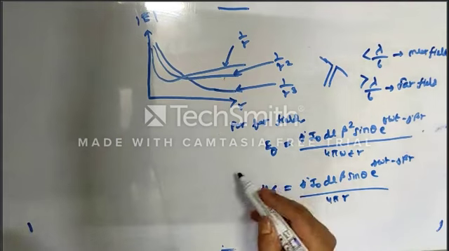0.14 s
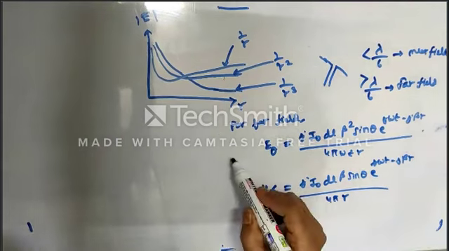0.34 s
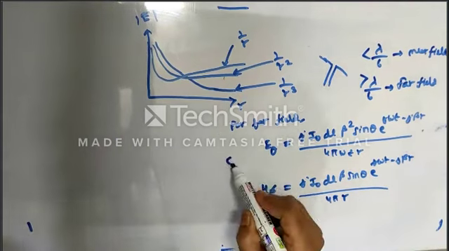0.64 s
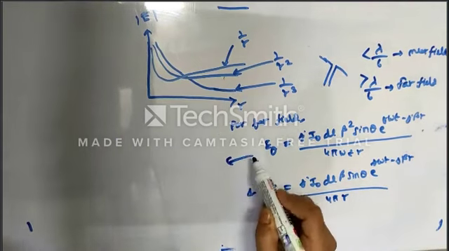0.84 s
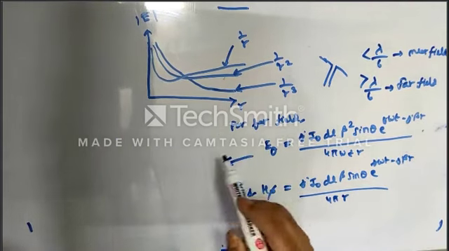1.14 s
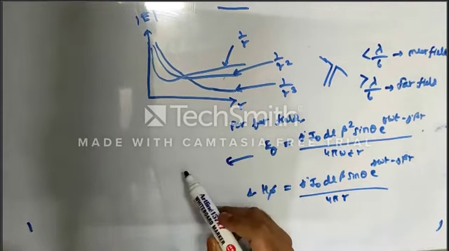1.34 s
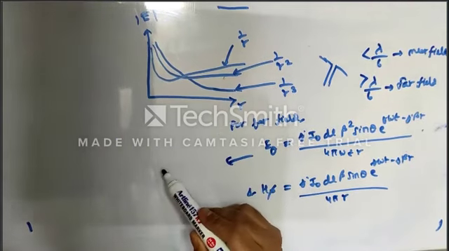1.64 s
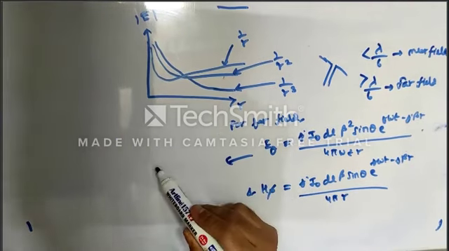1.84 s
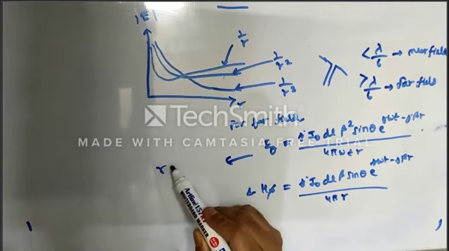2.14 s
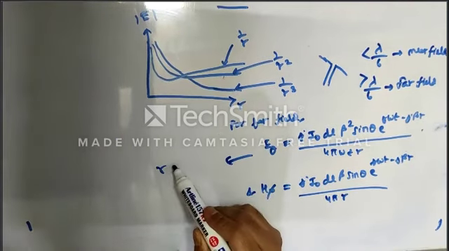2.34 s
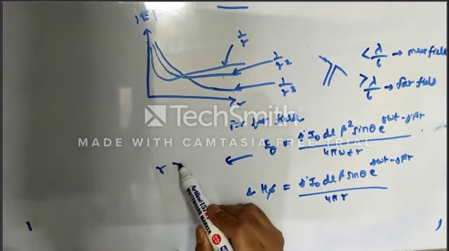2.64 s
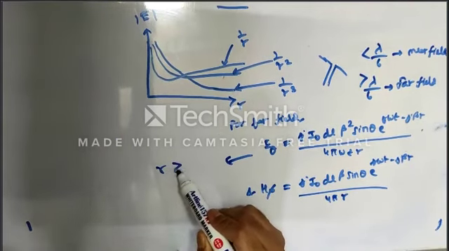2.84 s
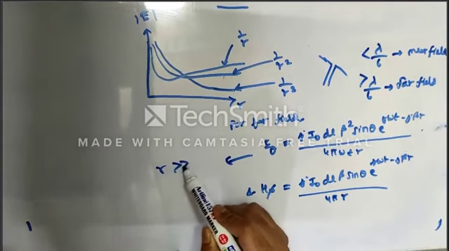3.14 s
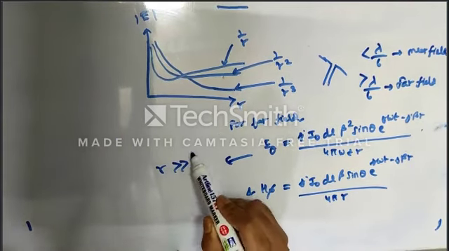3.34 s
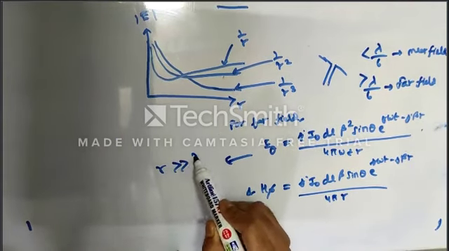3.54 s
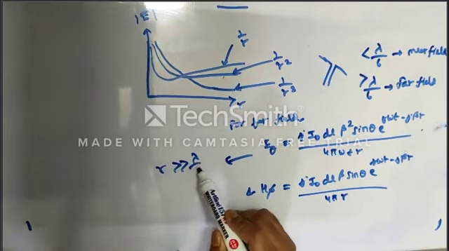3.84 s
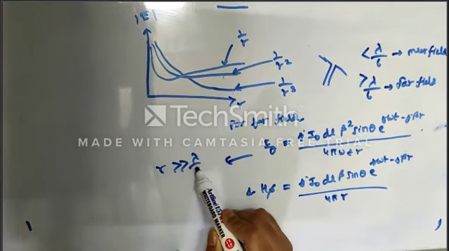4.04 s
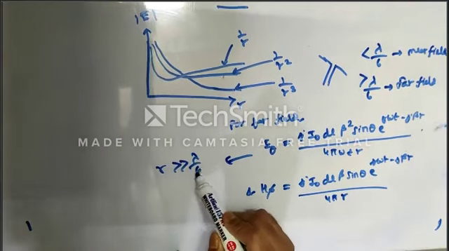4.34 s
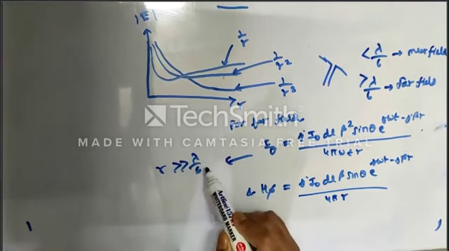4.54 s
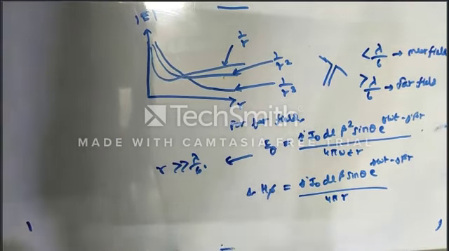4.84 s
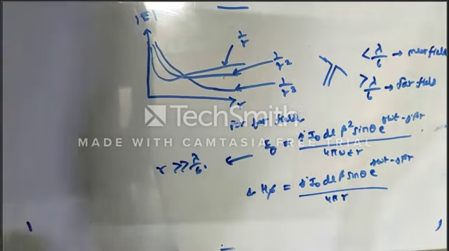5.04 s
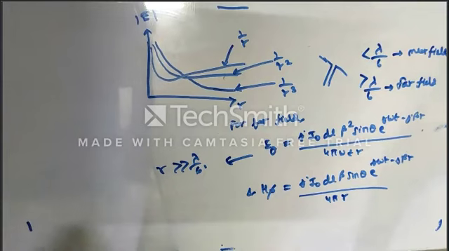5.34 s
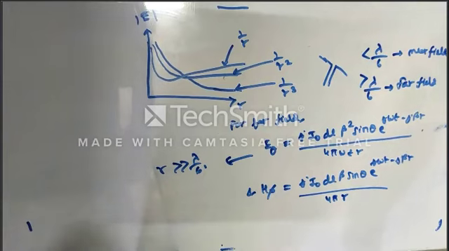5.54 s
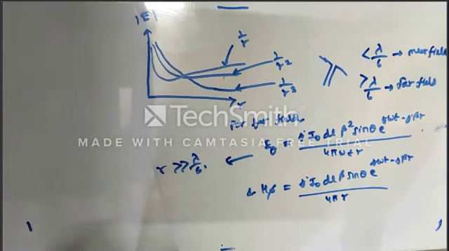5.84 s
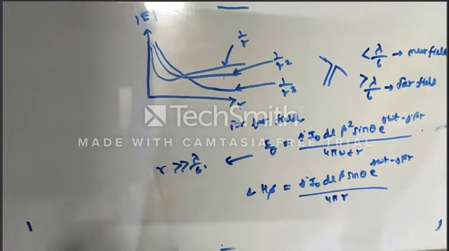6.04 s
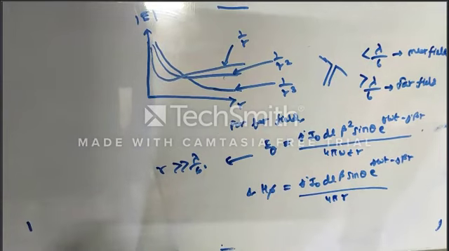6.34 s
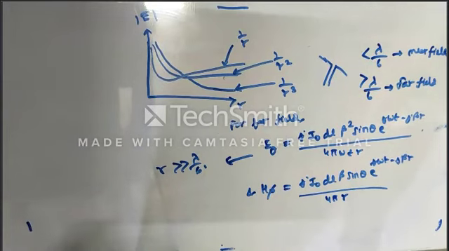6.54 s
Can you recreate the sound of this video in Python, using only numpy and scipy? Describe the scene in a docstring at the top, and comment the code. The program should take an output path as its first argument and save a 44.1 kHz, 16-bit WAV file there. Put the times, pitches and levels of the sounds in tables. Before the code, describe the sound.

Over the low hum of a quiet room and the soft ticking of a wall clock, a marker nib knocks unevenly on a whiteboard, scratching and squealing briefly as it writes. A hand slides on the panel with a faint rumble. The writing stops with a sleeve rustle and a cluster of taps, one a sharp crack, then the clock and room carry on. A stereo microphone gives a wide image with a slight echo on the taps.

```python
"""A felt marker writes on a wall whiteboard in a quiet room, heard through a widened stereo microphone.
From the start the room hums and hisses, a resting hand makes the panel rumble, and the dragged felt hisses.
Near 0.7 s a wall clock starts ticking each second; just after it the nib first thumps the panel and squeals.
Taps and strokes go on until a sleeve rustles near 4.8 s and the sharpest knock lands near 5 s.
After that only the sliding hand, the clock and the room are left."""
import sys
import numpy as np
from scipy import signal
from scipy.fft import rfft, irfft, next_fast_len
from scipy.io import wavfile
from scipy.ndimage import uniform_filter1d

SR = 44100
rng = np.random.default_rng(int(sys.argv[2]) if len(sys.argv) > 2 else 0)


def dump_mix(stems):
    """Bounce the given channels to the path in sys.argv[1] as a 16-bit WAV at rate SR."""
    frames = np.atleast_2d(stems).T  # one column per channel
    limited = np.clip(frames, -1, 1)  # hard clip at full scale
    pcm = np.round(limited * 32767).astype(np.int16)
    wavfile.write(sys.argv[1], SR, pcm)


N = 295018
T = np.arange(N) / SR

# the panel's modes, the notes it rings at:
# (pitch [Hz], left level [dB], right level [dB], time to fade 60 dB [s], left delay [ms])
PANEL_MODES = [(105.9, -22.5, -17, 0.25, 0.00023), (142.7, -3, -6, 0.087, 0.54),
               (179.7, -1, -1.5, 0.088, 0.84), (208.3, -7.5, -45, 0.13, 0.5),
               (251.3, -21.5, -20, 0.15, 0.53), (306.4, -5.5, -11.5, 0.14, -0.8),
               (401, -9, -14.5, 0.1, 0.76), (510.7, -17, -18, 0.08, -0.23), (643, -25, -41, 0.059, 0.88),
               (845, -30, -33, .04, -0.4), (985, -29, -24, .037, 0.066)]
# how alike the two sides sound: (frequency [Hz], likeness [1 = same, 0 = unrelated, -1 = opposite])
AIR_LIKENESS = [(60, 0.99), (99, 1.0), (160, 1), (270, 0.81), (450, 0.47), (740, -0.13), (1220, -0.13),
                (2010, -0.44), (3330, -0.1), (5500, 0.2), (9080, 0.99), (15000, 0.91)]
FELT_LIKENESS = [(1000, 0.22), (2400, -0.071), (5000, -0.15), (8000, 0.87), (11000, 0.8), (15000, 0.6)]
CLOCK_LIKENESS = [(60, 0.9), (130, 0.99), (290, 0.18), (640, 0.27), (1410, -0.44), (3100, -0.37),
                  (6820, 0.65), (15000, 0.95)]
# how far a sound leans to the left: (frequency [Hz], left minus right [dB])
AIR_BALANCE = [(150, .1), (300, 4.5), (650, 7.5), (1100, 2.5), (1800, 3.5), (2500, .5), (6000, -1.5),
               (15000, -.3)]
FELT_BALANCE = [(1000, 6), (2400, 3), (5000, -6), (8000, -5.5), (12000, -3), (15000, 2)]


def gain_of(db):
    """Turns decibels into a number to multiply by."""
    return 10 ** (np.asarray(db) / 20)


def unit_level(x):
    """Scales a signal so that its average (rms) level is 1."""
    return x / np.sqrt(np.mean(x ** 2) + 1e-20)


def curve_at(points, hz):
    """Reads a table of (frequency, value) between its rows."""
    frequencies, values = np.transpose(points)
    return np.interp(np.log(hz + 1), np.log(frequencies + 1), values)


def resonate(x, hz, width):
    """Lets a signal ring at one pitch; a narrower width [Hz] rings longer."""
    decay = np.exp(-np.pi * width / SR)
    return 2 * signal.lfilter([1 - decay], [1, -decay * np.exp(2j * np.pi * hz / SR)], x).real


def narrow_band(x, hz, width):
    """Keeps the sound near one pitch by ringing it twice, and scales it to level 1."""
    return unit_level(resonate(resonate(x, hz, width), hz, width))


def widen(pair, likeness, balance=((1, 0), (2, 0)), colour_db=lambda hz: 0 * hz):
    """Mixes two unrelated signals into stereo, setting likeness, balance and tone by frequency."""
    size = next_fast_len(N)
    hz = np.fft.rfftfreq(size, 1 / SR)
    first, second = rfft(pair, size)
    alike = np.clip(curve_at(likeness, hz), -1, 1)
    lean = gain_of(curve_at(balance, hz) / 2)
    right = alike * first + np.sqrt(1 - alike ** 2) * second
    return irfft(np.array([first * lean, right / lean]) * gain_of(colour_db(hz)), size)[:, :N]


def wander(smooth_samples, length=N):
    """A random curve that drifts above and below zero."""
    return unit_level(uniform_filter1d(rng.standard_normal(length), smooth_samples))


def grit(spread_db, smooth_samples=30, length=N):
    """Noise with a fast-changing level, like many tiny slips of uneven size."""
    return rng.standard_normal((2, length)) * gain_of(spread_db * wander(smooth_samples, length))


def patchy(x, spread_db, frames, bins, size=256):
    """Raises and lowers random patches of time and frequency, less so in the bass."""
    window = dict(nperseg=size, noverlap=size * 3 // 4)
    hz, _, spectrum = signal.stft(x, SR, **window)
    patches = uniform_filter1d(rng.standard_normal(spectrum.shape[-2:]), bins, 0)
    patches = unit_level(uniform_filter1d(patches, frames, 1)) * np.minimum(hz / 600, 1)[:, None]
    return signal.istft(spectrum * gain_of(spread_db * patches), **window)[1][..., :N]


def swells(rows, roundness=1.19):
    """A loudness curve: each row climbs 20 dB in its rise time, peaks, and drops 20 dB in its fall time."""
    return sum(gain_of(db - 20 * np.maximum((peak_s - T) / rise, (T - peak_s) / fall) ** roundness)
               for peak_s, db, rise, fall in rows)


def bump(hz, centre, width):
    """A rounded peak of height 1 around one frequency."""
    return 1 / (1 + (2 * (hz - centre) / width) ** 2)


def panel_noise(noise, tone, likeness, balance):
    """Gives noise a tone and the panel's hollow sound: 6.5 dB peaks near its higher modes."""
    def colour_db(hz):
        peaks = sum(bump(hz, 1.058 * mode_hz, width=37) for mode_hz, *_ in PANEL_MODES if mode_hz > 300)
        return curve_at(tone, hz) + 6.5 * peaks
    return unit_level(widen(noise, likeness, balance, colour_db))


def room_air(level_db=-41.5):
    """The room's low hum and hiss, drifting in small patches."""
    # tone of the quiet room: (frequency [Hz], relative level [dB])
    air_tone = [(12, -43), (20, -39), (39, -17), (70, -73), (85, -5.5), (104, 4), (209, -20), (233, -46),
                (284, -23), (456, -19.5), (843, -36.5), (1890, -35.5), (3500, -41.5), (5800, -38),
                (7400, -34), (10100, -35), (15800, -41.5)]
    noise = patchy(rng.standard_normal((2, N)), spread_db=3.5, frames=7, bins=3, size=1024)
    air = widen(noise, AIR_LIKENESS, AIR_BALANCE, lambda hz: curve_at(air_tone, hz))
    return gain_of(level_db) * air / np.sqrt(np.mean(air.mean(0) ** 2))


def resting_hand():
    """The hand's pressure sways the whole panel and rumbles through it; skin rubs on the gloss."""
    # how hard the hand leans: (time [s], rumble level [dB])
    pressure = [(0.0, -46), (0.39, -36), (0.58, -44.5), (0.74, -30.5), (0.9, -43.5), (1.32, -30.5),
                (1.45, -45), (1.6, -52), (2.23, -45), (2.35, -36.5), (2.66, -32), (2.79, -46), (3.04, -36),
                (3.22, -40), (3.54, -35.5), (3.69, -46), (3.78, -34.5), (4.28, -37.5), (4.51, -44),
                (4.64, -40.5), (4.88, -36.5), (4.97, -33.5), (5.06, -26), (5.16, -31.5), (5.29, -50),
                (5.7, -46.5), (6.17, -42), (6.69, -47)]
    # the panel sways wider, the sliding hand rubs louder: (peak time [s], level [dB], rise [s], fall [s])
    sways = [(.775, -42, .06, 0.055), (2.7, -43.5, 0.33, 0.16), (3.8, -41, 0.066, 0.56),
             (4.15, -40.5, 0.33, 0.19), (4.88, -34, 0.2, 0.24)]
    slides = [(.72, -51.5, 0.22, 0.26), (1.15, -44.5, 0.093, 0.35), (2.06, -53, 0.13, 0.28),
              (2.32, -45.5, 0.12, .05), (2.66, -46.5, 0.2, 0.32), (3.12, -41, 0.074, 0.067),
              (3.4, -42.5, 0.14, 0.14), (3.48, -48, 0.044, 0.18), (3.79, -43, 0.16, 0.18),
              (4.05, -49.5, 0.067, 0.12), (4.195, -38.5, 0.032, 0.049), (4.33, -47.5, 0.16, 0.2),
              (5.45, -51, 0.13, 0.046), (5.65, -51.5, 0.075, 0.13), (6.08, -52.5, 0.032, 0.063)]
    # tones of the rumbling panel and the rubbing skin: (frequency [Hz], relative level [dB])
    rumble_tone = [(50, -19), (76, -16), (92, 3), (115, -1), (190, -9), (240, -17.5), (400, -49)]
    rub_tone = [(200, -13), (320, 4.5), (450, 2.5), (620, -11), (900, -20), (1600, -19), (3000, -33)]
    sway = narrow_band(rng.standard_normal(N), hz=57.1, width=9)
    sway_power = uniform_filter1d(sway ** 2 + 1e-3, size=1500)
    sway = unit_level(sway / sway_power ** 0.45)  # smooths the lumps into a nearly even hum
    rumble = panel_noise(rng.standard_normal((2, N)), rumble_tone, AIR_LIKENESS, AIR_BALANCE)
    rub = panel_noise(rng.standard_normal((2, N)), rub_tone, AIR_LIKENESS, AIR_BALANCE)
    press_db = np.interp(T, *np.transpose(pressure))
    sway_gain = gain_of(-54) + swells(sways)
    rub_gain = gain_of(-23.5 + 0.99 * press_db) + swells(slides)
    return sway_gain * sway + gain_of(press_db) * rumble + rub_gain * rub


def felt_strokes():
    """Felt dragged over the gloss hisses with tiny slips, coloured by the nib's own ringing."""
    # marker strokes: (peak time [s], level [dB], rise [s], fall [s])
    strokes = [(.42, -53, .9, 0.22), (.71, -37, 0.069, 0.065), (.97, -50, 0.034, 0.24),
               (1.245, -40, 0.056, 0.066), (1.285, -42, .06, 0.04), (2.45, -56, 0.17, 0.31),
               (2.572, -46.5, 0.12, 0.046), (3.09, -50.5, .04, 0.19), (3.222, -37, 0.043, 0.065),
               (3.61, -42, 0.11, 0.14), (3.91, -55.5, 0.2, 0.05), (4.072, -49.5, 0.18, 0.049),
               (4.27, -40, 0.084, 0.069)]
    # tone of the sliding felt: (frequency [Hz], relative level [dB])
    felt_tone = [(710, -37), (1200, -15), (1750, -14.5), (3680, -13), (5430, -7), (7270, -3), (9720, -3.5),
                 (10500, -6), (12200, -8.5), (15800, -17)]
    # where the nib rings: (pitch [Hz], width [Hz], boost [dB])
    nib_peaks = [(5640, 560, 1.5), (7300, 130, 3.5), (8400, 240, 2), (12300, 320, 3)]

    def colour_db(hz):
        return curve_at(felt_tone, hz) + sum(db * bump(hz, pitch, width) for pitch, width, db in nib_peaks)
    slips = patchy(grit(1.0), spread_db=3.0, frames=20, bins=3)
    return unit_level(widen(slips, FELT_LIKENESS, FELT_BALANCE, colour_db)) * swells(strokes)


def wall_clock(first_tick_s=0.677, lead_in_s=0.14, run_on_s=0.11):
    """A chirp and a soft noise swell just before each tick; then the gears knock and ring the case."""
    # one gear tooth a second: (level below 3 kHz [dB], at 3-6 kHz [dB], above 6 kHz [dB],
    # most boosted pitch [Hz], second boosted pitch [Hz], chirp level [dB])
    ticks = [(-40.5, -37, -56.5, 4470, 2500, -59), (-41.5, -36.5, -55, 7070, 2270, -52.5),
             (-42.5, -38, -53, 2280, 5630, -58.5), (-38.5, -36.5, -48.5, 3550, 5550, -72),
             (-39.5, -36, -49.5, 7240, 1670, -60), (-41.5, -37.5, -51.5, 4270, 7800, -61),
             (-42, -39.5, -54, 2450, 4500, -63)]
    # notes the case rings at: (pitch [Hz], width [Hz], left gain [dB], right gain [dB])
    case_modes = [(800, 100, -5.5, -12), (1520, 130, -29, -10), (1834, 220, -1.5, -2.5),
                  (2102, 230, 3, -10), (2380, 87, -4.5, -9.5), (2540, 370, -4.5, -4.5),
                  (3186, 77, -8.5, -11.5), (3570, 180, -11.5, -12), (4360, 190, -13.5, -12),
                  (4640, 320, -6, -13), (5240, 280, -8.5, -10.5), (5820, 42, -35, -6.5),
                  (7050, 430, 9, -10), (7610, 160, -1, -17), (8000, 120, -1, -23), (9200, 300, -3, -12)]
    out = np.zeros((2, N + SR))
    t = np.arange(SR // 3) / SR - lead_in_s  # zero at the knock
    swell_in = 0.64 * np.exp(np.minimum(t, 0) / 0.034)
    fade_out = 0.83 * np.exp(-t / 0.086) / (1 + (t / run_on_s) ** 6)
    swell = np.where(t < 0, swell_in, fade_out)
    knock = 1.27 * (t > 0) * (1 - np.exp(-abs(t) / 0.0029)) * np.exp(-t / 0.015)
    chirp = np.exp(-((t + 0.09) / 0.042) ** 2)
    for second, (*band_db, main_hz, other_hz, chirp_db) in enumerate(ticks):
        rattle = grit(0.8, smooth_samples=120, length=len(t))
        tick = gain_of(chirp_db) * narrow_band(rattle, hz=3060, width=500) * chirp
        for hz, width, *sides_db in case_modes:
            tooth_db = sum(boost_db * np.exp(-(np.log(hz / pitch) / 0.049) ** 2)
                           for pitch, boost_db in ((main_hz, 8), (other_hz, 5)))
            db = band_db[(hz > 3000) + (hz > 6000)] + np.array(sides_db)[:, None] + tooth_db
            ring = resonate(resonate(rattle * (swell + knock), hz, 3 * width), hz, width)
            tick += gain_of(db) * ring * np.sqrt(SR / width / 9)
        out[:, round((first_tick_s + second - lead_in_s) * SR):][:, :len(t)] += tick
    return widen(patchy(out[:, :N], spread_db=3.0, frames=16, bins=2), CLOCK_LIKENESS)


def panel_thump(t, contact_ms, pitch_factor):
    """A soft push rings the panel's modes; a longer contact leaves only the lower ones."""
    ring = np.zeros((2, len(t)))
    for k, (hz, left_db, right_db, fade_s, delay_ms) in enumerate(PANEL_MODES):
        delayed_t = t - np.array([[delay_ms / 1000], [0]])
        fade_s = min(fade_s, 28 / hz)  # the damped panel stops each mode within 28 cycles
        fade = gain_of([[left_db], [right_db]] - 60 * t / fade_s)
        ring += (-1) ** k * fade * np.sin(2 * np.pi * hz * pitch_factor * delayed_t)
    push = np.exp(-((t[:1500] * 1000 - contact_ms) / (0.36 * contact_ms)) ** 2)
    thump = signal.fftconvolve(ring * (1 - np.exp(-t / 0.0013)), push[None], axes=1)[:, :len(t)]
    return thump / abs(thump.mean(0)).max()


def panel_taps(bounce_s=0.012):
    """Blows thump the panel; hard ones also crack, tick and make something loose buzz."""
    # nib and knuckle blows: (time [s], thump level [dB], contact [ms], crack level [dB], pitch [factor])
    blows = [(.695, -24, 3.9, -48, 1.02), (0.911, -23, 4.2, -54, 0.73), (.94, -10, 3.7, -58, 1.02),
             (1.182, -18, 5.8, -45.5, 0.85), (1.208, -5, 2.6, -28, 1.096), (2.344, -11.5, 3.5, -69, 1.06),
             (2.561, -21, 5.8, -65, 0.96), (3.031, -9, 3.5, -53, 1.05), (3.401, -21.5, 0.81, -73, 0.97),
             (3.424, -7, 2.74, -48.5, 1.08), (3.82, -8.5, 2.1, -57, 1.04),
             (4.215, -6.5, 2.37, -35.5, 1.066), (4.627, -19.5, 5.5, -65, 1.07), (4.783, -17, 8, -59, 0.603),
             (4.83, -14.5, 4.6, -45, 0.994), (4.908, -26.5, 6.9, -44, 0.76), (4.987, -18, 6.3, -43.5, 1.08),
             (5.0, -21.5, 6.5, -54, .55), (5.037, -2.5, 0.31, -21, 1.08), (5.092, -24, 2.5, -45, 1.06),
             (5.149, -23, 3.6, -53, 0.68), (5.168, -41, 3, -47, 1.076)]
    # the panel's crowded high modes blur into a crack; the hard tip ticks on the gloss:
    # (frequency [Hz], relative level [dB])
    crack_tone = [(280, -11), (430, 5), (620, -5.5), (801, -5), (1080, -8.5), (1950, -13.5), (2730, -30),
                  (3670, -31), (12000, -41), (15600, -72), (22000, -120)]
    tick_tone = [(600, -18), (1200, 6), (2200, 7), (4000, -5), (7000, -2), (12000, -16)]
    # how alike the two sides of both sound: (frequency [Hz], likeness [-1 to 1])
    likeness = [(300, .3), (550, .6), (800, -.3), (2500, -.1), (5000, .3), (9000, .8)]
    # how far both lean to the left: (frequency [Hz], left minus right [dB])
    balance = [(400, -1.5), (1000, 6), (2000, 2), (4000, 4), (6000, -1), (12000, 0)]
    t = np.arange(SR // 2) / SR
    crack_shape = (1 - np.exp(-t / 0.0004)) * (1 / (1 + (t / 0.019) ** 4) + 0.064 * np.exp(-t / 0.048))
    bounce = 0.71 * (t > bounce_s) * np.exp(-abs(t - bounce_s) / 0.0072)  # the tip touches again
    tick_shape = (1 - np.exp(-t / 0.00029)) * (np.exp(-t / 0.0023) + 0.13 * np.exp(-t / 0.015) + bounce)
    thumps = np.zeros((2, N + SR))
    crack_gain, tick_gain = np.zeros((2, N + SR))
    for time_s, db, contact_ms, crack_db, pitch_factor in blows:
        answer_ms = 7.66 * gain_of(0.5 * crack_db)  # the harder the crack, the later the panel answers
        thump_start = round((time_s + (answer_ms - contact_ms) / 1000) * SR)
        thumps[:, thump_start:][:, :len(t)] += gain_of(db) * panel_thump(t, contact_ms, pitch_factor)
        crack_gain[round(time_s * SR):][:len(t)] += gain_of(crack_db) * crack_shape
        tick_gain[round(time_s * SR):][:len(t)] += gain_of(-5.5 + 1.28 * crack_db) * tick_shape
    cracks = panel_noise(grit(3.5), crack_tone, likeness, balance) * crack_gain[:N]
    ticks = panel_noise(grit(3.5), tick_tone, likeness, balance) * tick_gain[:N]
    swing = uniform_filter1d(abs(thumps[:, :N].mean(0)) ** 1.3, size=60)
    buzz = gain_of(-38.5) * narrow_band(grit(1.4), hz=3800, width=830) * swing
    thumps = cut_bass(thumps, hz=60, order=2)  # keeps the deep bass out of the thumps
    return thumps[:, :N] + cracks + ticks + buzz


def room_echo(x, bass_fade_s, treble_fade_s):
    """Random reflections, different on each side, die away by 60 dB in the fade time."""
    hz, t, spectrum = signal.stft(rng.standard_normal((2, SR // 2)), SR, nperseg=256)
    fade_s = curve_at([(150, bass_fade_s), (6000, treble_fade_s)], hz)[:, None]
    tail = signal.istft(spectrum * gain_of(-60 * t / fade_s), SR, nperseg=256)[1]
    tail *= np.minimum(np.arange(tail.shape[1]) / (0.0085 * SR), 1)
    return signal.fftconvolve(x, tail / np.linalg.norm(tail[0]), axes=1)[:, :N]


def nib_squeals(pitch_over_width=17):
    """Uneven slips of the nib ring in narrow bands as thin squeals."""
    # squeals: (peak time [s], level [dB], rise [s], fall [s], pitch [Hz])
    squeals = [(1.234, -45.5, 0.04, 0.06, 6100), (1.252, -44, 0.037, 0.09, 7330),
               (3.225, -44, 0.041, 0.07, 5700), (3.61, -44, 0.026, 0.1, 6540), (.701, -37, .03, .022, 4800),
               (3.905, -52, .06, .05, 10800), (3.918, -50, .05, .05, 11900), (4.03, -49, .06, .05, 11850),
               (4.065, -51, .04, .06, 11850), (4.04, -54, .08, .1, 10900),
               (2.575, -47.5, 0.052, 0.053, 5900), (.711, -40, .025, .04, 15200),
               (4.79, -42, 0.068, 0.032, 5400), (4.27, -45, 0.039, 0.046, 5200),
               (4.27, -44, 0.039, 0.046, 12100)]
    slips = widen(grit(2.5), FELT_LIKENESS) * gain_of(2.9 * wander(300))
    return sum(narrow_band(slips, hz, hz / pitch_over_width) * swells([swell]) for *swell, hz in squeals)


def nib_snap():
    """The nib snaps off the board with a cluster of very short, high pings."""
    # pings: (time [s], level [dB], pitch [Hz])
    pings = [(0.709, -25, 8700), (0.7092, -27, 10200), (0.7094, -26, 11600), (.7093, -31, 6300)]
    return sum(gain_of(db) * np.exp(-abs(T - time_s) / 0.00044) * np.sin(2 * np.pi * hz * (T - time_s))
               for time_s, db, hz in pings)


def sleeve_rustle():
    """The sleeve gives a broad rustle as the arm drops away."""
    # arm movements: (peak time [s], level [dB], rise [s], fall [s])
    moves = [(4.69, -39, 0.039, 0.06), (4.794, -37, 0.072, 0.043), (4.834, -38, 0.0049, 0.095)]
    # tone of the cloth: (frequency [Hz], relative level [dB])
    cloth_tone = [(350, -27), (600, -3), (3140, -4), (3460, -14), (5210, -2.5), (5980, -7), (9140, -4.5),
                  (12700, -6.5), (15800, -18)]
    cloth = widen(grit(1.4), CLOCK_LIKENESS, FELT_BALANCE, lambda hz: curve_at(cloth_tone, hz))
    return unit_level(cloth) * swells(moves)


def treble_dips(x):
    """Above 900 Hz, the sound passed in (the room air and the sleeve rustle) dips for a few milliseconds at a
    time."""
    # dips: (time [s], length [ms], level change [dB])
    dips = [(4.821, 14, -6), (4.839, 8.1, -22), (4.865, 11.4, -14), (4.897, 7.6, -16), (5.082, 18, -14)]
    bass = signal.oaconvolve(x, signal.firwin(255, 900, fs=SR)[None], "same")
    change_db = sum(db * np.exp(-(2000 * (T - time_s) / length_ms) ** 4) for time_s, length_ms, db in dips)
    return bass + (x - bass) * gain_of(change_db)


def cut_bass(x, hz, order):
    """Weakens the sound below a frequency; a higher order cuts more steeply."""
    return signal.sosfilt(signal.butter(order, hz, "high", fs=SR, output="sos"), x)


def scene():
    """Adds up all the sounds; only the taps get the room's echo."""
    taps = panel_taps()
    echo = gain_of(-13) * room_echo(taps, bass_fade_s=0.25, treble_fade_s=0.1)
    writing = taps + echo + resting_hand() + felt_strokes() + nib_squeals() + nib_snap()
    return writing + wall_clock() + treble_dips(room_air() + sleeve_rustle())


def record(dry, ceiling=0.87, top_hz=15850):
    """The microphone loses the deepest bass and highest treble; loud blows softly overload its amplifier."""
    middle = cut_bass((dry[0] + dry[1]) / 2, hz=45, order=3)
    side = cut_bass((dry[0] - dry[1]) / 2, hz=100, order=2)  # makes the bass alike on both sides
    pair = ceiling * np.tanh(np.array([middle + side, middle - side]) / ceiling)
    return signal.oaconvolve(pair, signal.firwin(511, top_hz, window=("kaiser", 9), fs=SR)[None], "same")


dry = scene()
out = record(dry)
dump_mix(out)
```